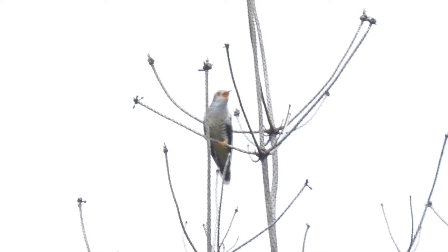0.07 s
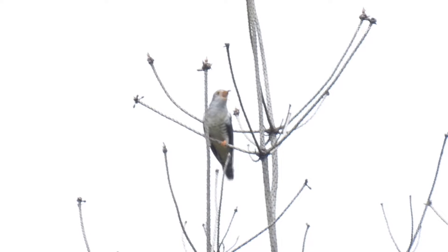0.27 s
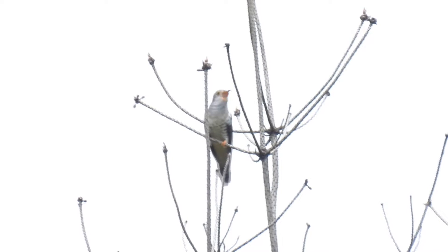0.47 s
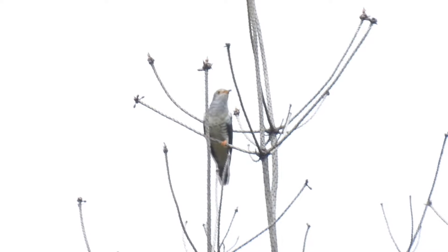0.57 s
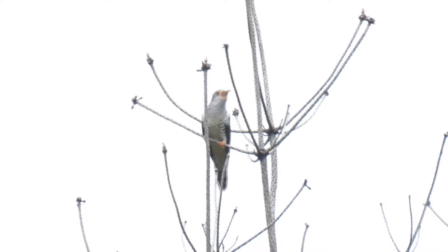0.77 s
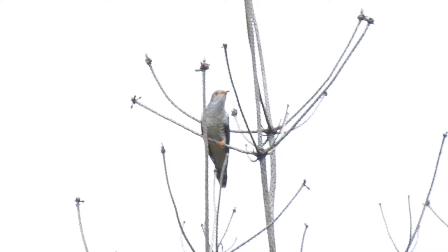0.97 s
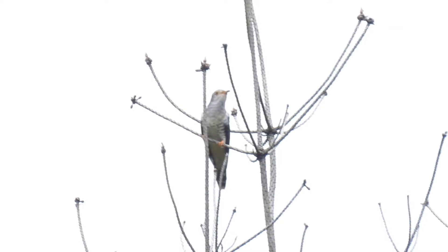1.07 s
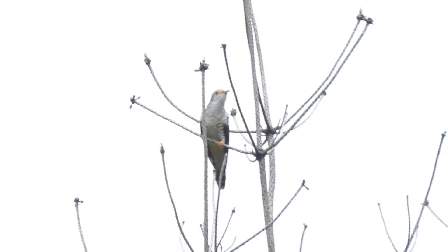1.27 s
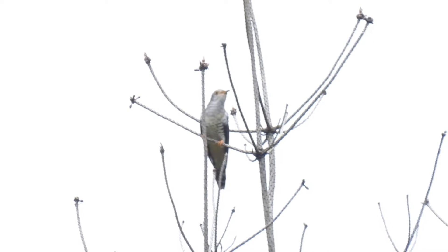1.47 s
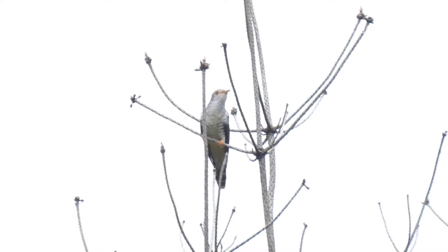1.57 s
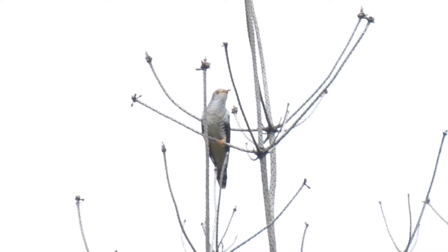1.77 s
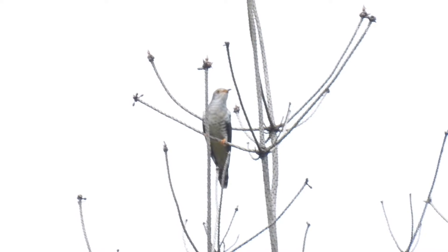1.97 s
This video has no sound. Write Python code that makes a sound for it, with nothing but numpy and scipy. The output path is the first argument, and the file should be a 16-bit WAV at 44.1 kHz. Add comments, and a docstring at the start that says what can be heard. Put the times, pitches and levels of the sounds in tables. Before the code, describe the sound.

A cuckoo whistles one phrase of six quick notes over a steady distant hiss.

```python
"""From the start, far water or traffic fills the air with a broad steady hiss, almost the same
in both channels. Then a small cuckoo on a bare branch whistles one phrase of six quick arched notes.
The whistle dips each time it glides through the narrow resonance of a side cavity in the throat.
The trees scatter a faint tail after each note; the bird pauses and the hiss goes on."""
import sys
import numpy as np
from scipy import signal
from scipy.fft import rfft, irfft
from scipy.io import wavfile
from scipy.ndimage import uniform_filter1d

SR = 44100
rng = np.random.default_rng(int(sys.argv[2]) if len(sys.argv) > 2 else 0)


def master_out(mix):
    """Clip the mix to full scale and print it as 16-bit PCM to the path in sys.argv[1]."""
    frames = np.transpose(np.atleast_2d(mix))
    ceiling = np.clip(frames, -1, 1)
    pcm = np.round(ceiling * 32767).astype(np.int16)
    wavfile.write(sys.argv[1], SR, pcm)


N = 90405


def cuckoo(edge_s=.0025, fade_db_per_s=100):
    """Harmonic series: each note is a gliding whistle with thin overtones locked to its phase."""
    # One table a note. Each row: time in seconds, pitch in Hz, level in dB ahead of the throat cavity.
    notes = [
        [(.198, 1740, -40), (.205, 1910, -38), (.209, 1998, -22.5), (.224, 2051, -12), (.231, 2110, -14.5),
         (.237, 2090, -24), (.242, 2000, -28), (.249, 1940, -49)],
        [(.418, 2130, -41), (.421, 2220, -26.5), (.426, 2370, -23), (.431, 2420, -21.5), (.438, 2254, -9.5),
         (.443, 2130, -19), (.448, 2012, -9.5), (.455, 2000, -15), (.467, 1990, -15), (.472, 1880, -24),
         (.48, 1751, -35)],
        [(.639, 2076, -41), (.646, 2290, -22.5), (.65, 2250, -19.5), (.656, 1866, -17), (.662, 1550, -25),
         (.671, 1920, -13), (.677, 2120, -14), (.683, 1924, -12), (.693, 1540, -26), (.702, 1425, -27),
         (.707, 1400, -37)],
        [(.804, 1950, -31), (.812, 2366, -25), (.816, 2505, -23.5), (.821, 2590, -26), (.825, 2535, -18.5),
         (.83, 2400, -26), (.833, 2330, -10.5), (.836, 2060, -10.5), (.843, 1610, -19), (.847, 1436, -24.5),
         (.852, 1330, -31.5), (.864, 1300, -29)],
        [(.962, 1750, -32), (.968, 2014, -23.5), (.976, 2310, -13.5), (.983, 2503, -23), (.986, 2483, -33),
         (.993, 2455, -21), (.998, 2400, -10.5), (1.004, 2260, -9), (1.012, 1897, -11.5), (1.02, 1502, -23),
         (1.03, 1420, -23), (1.038, 1410, -37)],
        [(1.13, 1650, -38), (1.136, 1804, -23), (1.151, 2183, -9.5), (1.156, 2256, -11.5), (1.169, 2043, -7.5),
         (1.173, 1935, -12), (1.184, 1890, -15.5), (1.201, 1695, -25), (1.213, 1650, -32)],
    ]
    # One row a note. Each row: base level of partials 2 and 4 in dB, base level of partial 3 in dB.
    overtone_bases = [(-39, -56), (-38.5, -51), (-40, -54), (-38, -46.5), (-47, -46), (-48, -56)]
    # Each row: multiple of the pitch, offset in dB at 2400 Hz pitch, dB per octave as the beak opens.
    overtones = [(2, -12, 22), (3, 2, 50), (4, 1.5, 27)]
    t, out = np.arange(N) / SR, np.zeros(N)
    for note, base_db in zip(notes, overtone_bases):
        times, hz, db = np.array(note, float).T
        pitch = smooth(np.interp(t, times, hz), .002)
        phase = 2 * np.pi * np.cumsum(pitch) / SR
        voice = undb(smooth(np.interp(t, times, db), .00062)) * np.sin(phase)
        octaves = np.log2(pitch / 2400)
        fade_db = fade_db_per_s * np.maximum(t - times[0], 0)
        for multiple, offset_db, slope in overtones:
            overtone_db = base_db[multiple % 2] + offset_db + slope * octaves - fade_db
            voice += undb(overtone_db) * np.sin(multiple * phase)
        gate = np.clip(np.minimum(t - times[0], times[-1] - t) / edge_s, 0, 1)
        out += np.sqrt(2) * gate * voice
    return out


def throat_cavity(voice, centre_hz=2065, width_hz=143, depth=.87):
    """Antiresonance: a side cavity of the throat cancels most of the sound at its own pitch."""
    cavity = signal.iirpeak(centre_hz, centre_hz / width_hz, fs=SR)
    return voice - depth * signal.lfilter(*cavity, voice)


def trees(call, tail_db=-21, t60_s=.3, delay_s=.012):
    """Scattering: the trees add dense late echoes to the direct call, decaying exponentially."""
    lag = np.arange(SR // 2) / SR
    tail = rng.standard_normal(len(lag)) * undb(-60 * lag / t60_s) * (lag > delay_s)
    tail /= np.sqrt(np.sum(tail ** 2))
    return call + undb(tail_db) * signal.fftconvolve(call, tail)[:N]


def far_hiss(level_db=-33, swell_db=.15, flicker_db=.3):
    """Broadband noise of far water or traffic: its octave bands swell together and flicker alone."""
    # Each row: frequency in Hz, relative spectral density in dB of the part both channels share.
    mid_spectrum = [(15, -50), (30, -31), (60, -26.5), (129, -15), (250, -14.5), (380, -11.5), (602, -8.5),
                    (800, -5), (1120, -4.5), (1500, -5), (1970, -7.5), (2350, -8), (3000, -10), (4930, -14),
                    (9200, -20.5), (10200, -20), (10800, -21), (12500, -24), (15700, -30.5)]
    # Each row: frequency in Hz, level in dB of the side signal relative to the shared part.
    side_spectrum = [(60, -18), (200, -24), (650, -35), (1000, -54), (5000, -51.5), (9000, -36),
                     (15000, -20)]
    hz = np.fft.rfftfreq(N, 1 / SR)
    mid_db = on_log(mid_spectrum, hz)
    mid = rfft(rng.standard_normal(N)) * undb(mid_db)
    side = rfft(rng.standard_normal(N)) * undb(mid_db + on_log(side_spectrum, hz))
    gain = undb(level_db) / np.std(irfft(mid, N))
    out, swell = np.zeros((2, N)), wander(6)
    octave = np.clip(np.log2(np.maximum(hz, 1) / 30), 0, 9)  # counted up from 30 Hz
    for band in range(10):
        share = np.clip(1 - abs(octave - band), 0, 1)
        band_mid, band_side = irfft(mid * share, N), irfft(side * share, N)
        drift = undb(swell_db * swell + flicker_db * wander(8.17))
        out += drift * np.array([band_mid + band_side, band_mid - band_side])
    return gain * out


def undb(db):
    """Amplitude ratio of a level in dB."""
    return 10 ** (np.asarray(db) / 20)


def on_log(table, hz):
    """Interpolation of an (Hz, dB) table along a log-frequency axis."""
    rows = np.array(table, float)
    return np.interp(np.log(np.maximum(hz, 1)), np.log(rows[:, 0]), rows[:, 1])


def wander(rate_hz):
    """Random modulation: values held for 1 / rate_hz seconds, then smoothed; spread near 1."""
    hold = int(SR / rate_hz)
    steps = np.repeat(rng.standard_normal(N // hold + 1), hold)
    return 1.3 * smooth(steps, 1 / rate_hz)[:N]


def smooth(x, seconds):
    """A moving average, applied twice, rounds corners."""
    width = max(int(seconds * SR), 1)
    return uniform_filter1d(uniform_filter1d(x, width), width)


def scene():
    """Superposition: the bird and its echoes in the middle, over the hiss."""
    return trees(throat_cavity(cuckoo())) + far_hiss()


def record(dry, cutoff_hz=15720):
    """Band limiting: an elliptic low-pass filter cuts the top steeply."""
    return signal.sosfilt(signal.ellip(14, .2, 80, cutoff_hz, fs=SR, output="sos"), dry)


dry = scene()
out = record(dry)
master_out(out)
```